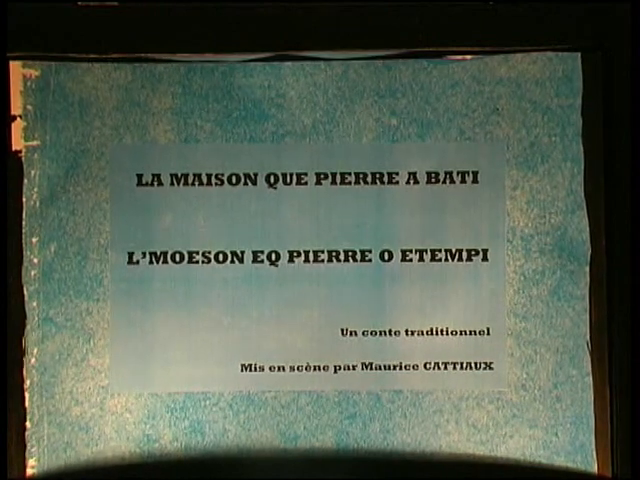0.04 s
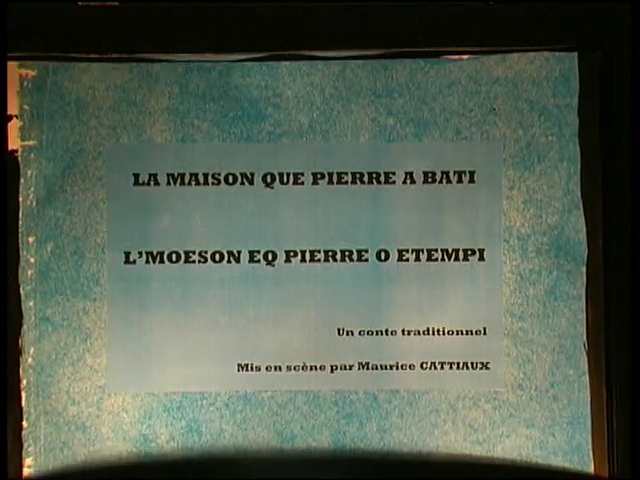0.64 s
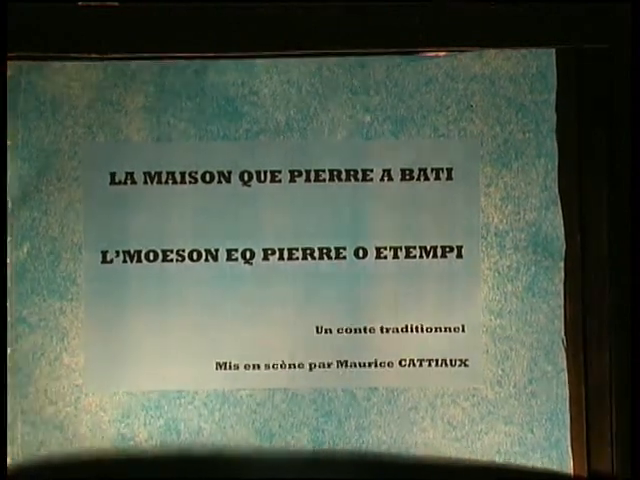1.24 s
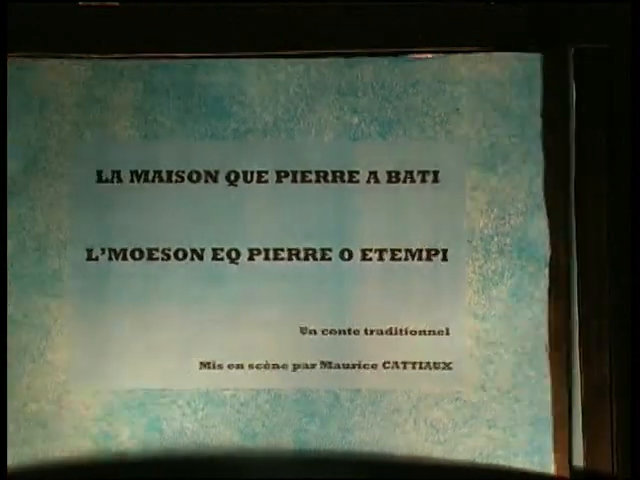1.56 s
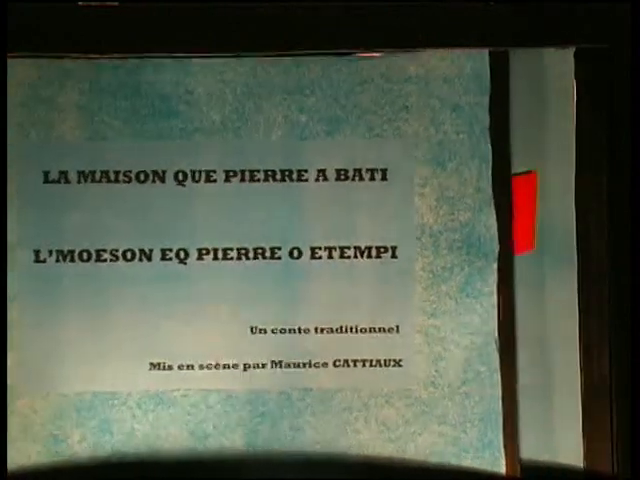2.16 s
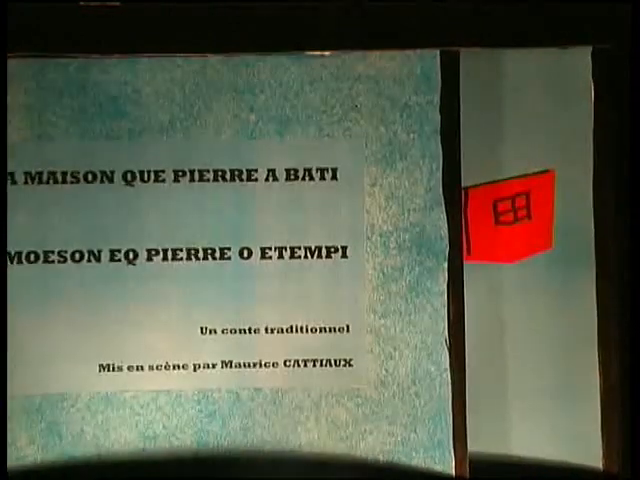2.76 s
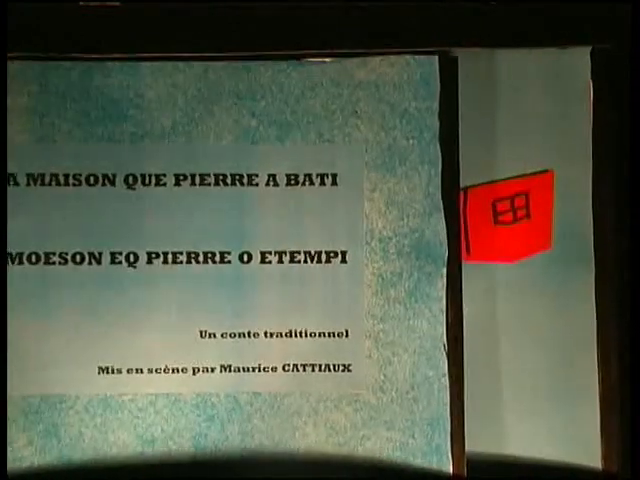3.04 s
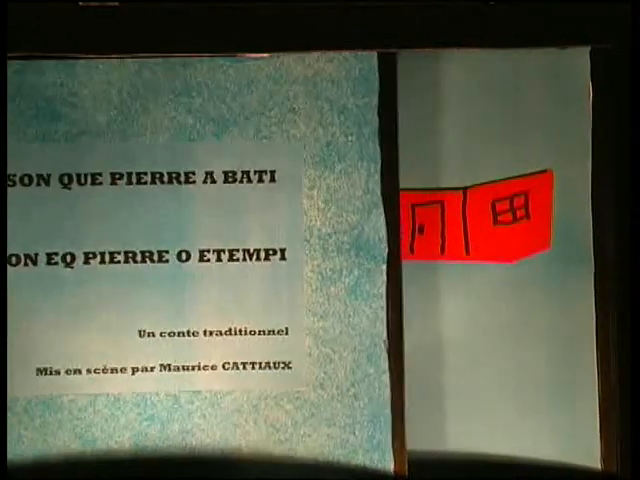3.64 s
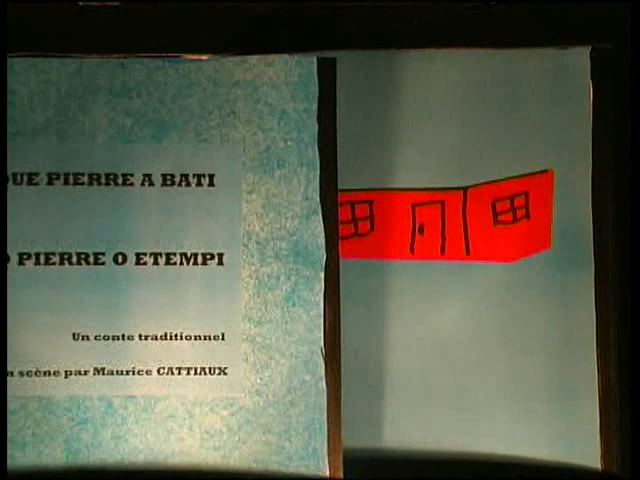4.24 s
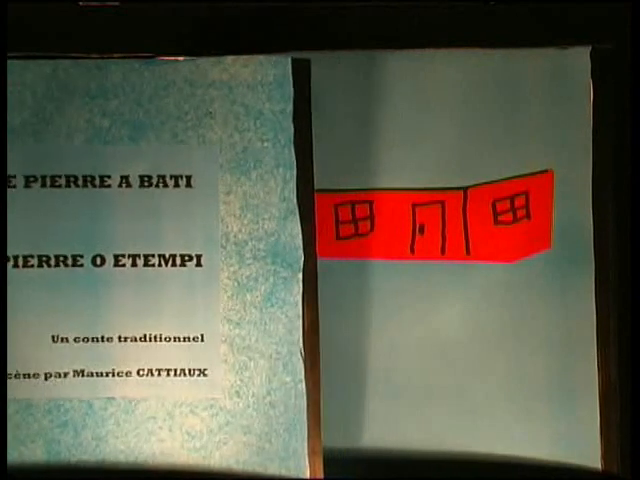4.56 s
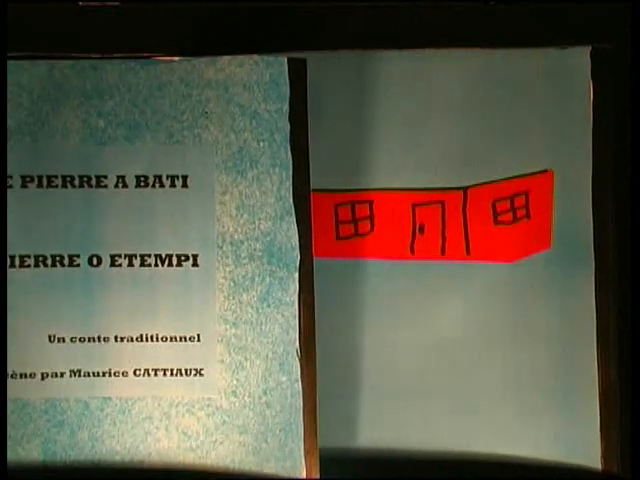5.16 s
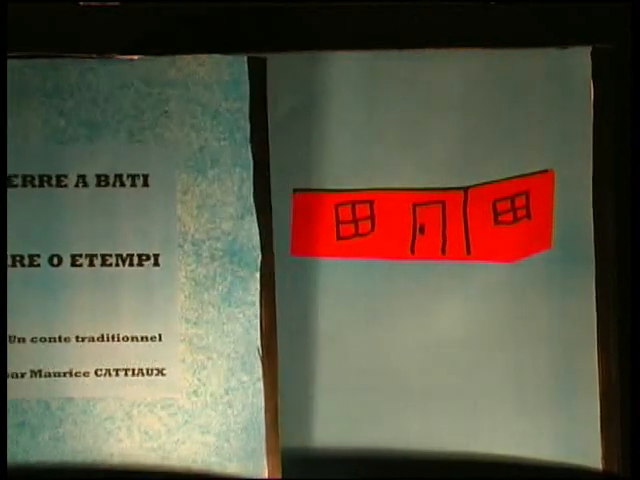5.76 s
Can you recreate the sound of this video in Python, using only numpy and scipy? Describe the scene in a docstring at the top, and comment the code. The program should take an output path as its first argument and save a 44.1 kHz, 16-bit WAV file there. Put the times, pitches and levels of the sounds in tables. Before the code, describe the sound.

A stiff card is drawn out of a wooden frame, close by in a small room. Soft hiss, a faint electrical hum and a thin high whine, leaning slightly right, run throughout. The card starts with faint rubs and small ticks, then scuffs and flexes with a slight low rumble at about 0.8 seconds. Between 1 and 1.7 seconds come short, dry slides with crisp ticks and three light bumps on the wood. Another push brings a bump at 2.2 seconds and more low flexing. At 2.5 seconds the card strikes the frame with one sharp knock, by far the loudest sound, ringing briefly in the box and room. Soft scuffs and rubs continue until about 4 seconds, with two faint taps around 3.6 and 3.8. After a pause, a last gentle slide runs from 5.3 to 6 seconds, with a small tick at 5.7.

```python
"""A small room with a tabletop theatre: a stiff picture card is drawn sideways out of its wooden frame.
The card slides on catching fibres, scuffs where it binds in the groove and flexes with a low rumble.
Its edge ticks over the grain and bumps the frame, once sharply; the box and the room ring after it.
Underneath, electrical equipment hums and whines over a soft hiss."""
import sys
import numpy as np
from scipy import signal
from scipy.fft import rfft, irfft, next_fast_len
from scipy.io import wavfile

SR = 44100
rng = np.random.default_rng(int(sys.argv[2]) if len(sys.argv) > 2 else 0)


def generate_wav(signal):
    """Clip the signal to [-1, 1] and save it as 16-bit WAV at the path in sys.argv[1]."""
    frames = np.transpose(np.atleast_2d(signal))
    scaled = np.clip(frames, -1, 1) * 32767
    pcm = np.round(scaled).astype(np.int16)
    wavfile.write(sys.argv[1], SR, pcm)


N = 265297
TIME_S = np.arange(N) / SR
FFT_SIZE = next_fast_len(N)
BINS_HZ = np.fft.rfftfreq(FFT_SIZE, 1 / SR)
IMPULSE = signal.unit_impulse(2048)


def from_db(db):
    """Decibels to gain."""
    return 10 ** (np.asarray(db) / 20)


def unit_rms(x):
    """Scale to rms 1."""
    return x / np.sqrt(np.mean(np.abs(x) ** 2) + 1e-20)


def at_peak(x, db):
    """Scale to a peak level."""
    return from_db(db) * x / np.abs(x).max()


def at_hz(table, hz, column=1):
    """Interpolate a column over log frequency."""
    table = np.array(table)
    return np.interp(np.log(np.maximum(hz, 1)), np.log(table[:, 0]), table[:, column])


def band(x, low_hz, high_hz, order=2):
    """Causal band-pass."""
    edges_hz = np.clip([low_hz, high_hz], [15, 30], [0.44 * SR, 0.45 * SR])
    return signal.sosfilt(signal.butter(order, edges_hz, "band", fs=SR, output="sos"), x)


def soften(x, top_hz, order=4):
    """Low-pass: a contact of finite length lacks treble."""
    return signal.sosfilt(signal.butter(order, top_hz, fs=SR, output="sos"), x)


def colour(x, spectrum):
    """Impose a spectrum; rms 1."""
    shaped = rfft(x, FFT_SIZE) * from_db(at_hz(spectrum, BINS_HZ))
    return unit_rms(irfft(shaped, FFT_SIZE)[..., :N])


def drift(rate_hz):
    """Smooth random motion; rms 1."""
    hop, settle = 100, 1000
    pole = np.exp(-2 * np.pi * rate_hz * hop / SR)
    white = rng.standard_normal(N // hop + settle + 2)
    slow = signal.lfilter([1], [1, -2 * pole, pole * pole], white)[settle:]
    return np.interp(np.arange(N) / hop, np.arange(len(slow)), unit_rms(slow))


def stereo(mid, side, correlation):
    """Two independent signals to a correlated left and right."""
    left_right = np.sqrt(1 + correlation) * mid + np.sqrt(1 - correlation) * side * [[1], [-1]]
    return left_right / np.sqrt(2)


def pan(x, db):
    """Lean left (positive) or right (negative)."""
    return x * from_db([[db / 2], [-db / 2]])


def delay(x, delay_s):
    """Fractional delay, same length."""
    samples = np.arange(len(x))
    return np.interp(samples - delay_s * SR, samples, x, left=0)


def add(track, start_s, sound):
    """Mix a short sound into a track."""
    start = round(start_s * SR)
    track[..., start:start + sound.shape[-1]] += sound[..., :N - start]


def swells(rows):
    """Envelope of Gaussian swells."""
    return sum(from_db(db) * np.exp(-0.5 * ((TIME_S - centre_s) / sigma_s) ** 2)
               for centre_s, db, sigma_s in rows)


# Hiss spectrum: freq_hz, density_db
HISS_SPECTRUM = [(20, -6.5), (45, -5), (100, -4), (200, -5), (330, -10), (600, -13), (1200, -14),
                 (2500, -15), (3900, -14.5), (5000, -19), (8000, -22.5), (11000, -26.5), (13000, -33),
                 (14500, -39)]
# Left-right likeness: freq_hz, correlation
HISS_CORRELATION = [(40, 0.45), (100, 0.97), (300, 0.3), (700, 0.06), (2000, 0.12), (5000, 0.045),
                    (12000, 0.023)]

def hiss(level_db=-56):
    """Room air: alike at both ears in the bass, wide in the treble."""
    mid, side = rfft(rng.standard_normal((2, FFT_SIZE)))
    air = irfft(stereo(mid, side, at_hz(HISS_CORRELATION, BINS_HZ)), FFT_SIZE)
    return from_db(level_db) * colour(air, HISS_SPECTRUM)


# Harmonics of 50 Hz mains: pitch_hz, left_db, right_db, left_lead_rad
MAINS_HARMONICS = [(150, -76, -50.5, 2.3), (1500, -68, -66, 0.69), (1800, -74.5, -76, 0.5)]

def hum(waver_db=0.4):
    """Nearly steady mains harmonics, unequal at the two ears."""
    out = np.zeros((2, N))
    for hz, left_db, right_db, lead_rad in MAINS_HARMONICS:
        tone = np.sqrt(2) * np.sin(2 * np.pi * hz * TIME_S + [[lead_rad], [0]])
        out += tone * from_db([[left_db], [right_db]]) * from_db(waver_db * drift(3))
    return out


# Leading whine tones: pitch_hz
WHINE_LEAD_HZ = (3540, 4046)
# Their slow swells: mean_db, swing_db, period_s, crest_s
WHINE_SWELLS = [(-66, 3, 1.58, 4.64), (-66, 2.5, 1.216, 3.24)]
# Faint whine tones: pitch_hz
WHINE_FAINT_HZ = (3300, 3446, 3600, 3635, 3746, 3899, 3951, 4199, 4251, 5055, 5469, 5563, 6988, 7180, 11100,
                  11396, 11698)
# Their strengths: level_db
WHINE_FAINT_DB = (-81, -80, -75.5, -74, -76, -72.5, -79, -76, -77.5, -95, -85.5, -80, -84.5, -77, -89, -89,
                  -89)

def whine(waver_db=3.8, wander_hz=0.74, left_db=-4, right_lag_s=16e-6):
    """High electrical tones, right of centre, swelling singly and wandering in pitch together."""
    lead = [(hz, db + swing_db * np.cos(2 * np.pi * (TIME_S - crest_s) / period_s))
            for hz, (db, swing_db, period_s, crest_s) in zip(WHINE_LEAD_HZ, WHINE_SWELLS)]
    faint = [(hz, db + waver_db * drift(1)) for hz, db in zip(WHINE_FAINT_HZ, WHINE_FAINT_DB)]
    wander_cycles = np.cumsum(wander_hz * drift(1.9)) / SR
    tones = np.zeros(N)
    for hz, db in lead + faint:
        phase = 2 * np.pi * (hz * TIME_S + wander_cycles + rng.random())
        tones += np.sqrt(2) * from_db(db) * np.sin(phase)
    return np.array([tones * from_db(left_db), delay(tones, right_lag_s)])


# Reverberation: freq_hz, gain_db, t60_s
ROOM_DECAY = [(140, 4, 0.29), (240, 11.5, 0.27), (382, 4.5, 0.42), (590, 9, 0.53), (850, 9.5, 0.4),
              (1060, 2.5, 0.42), (1280, -5.5, 0.41), (1810, 2, 0.5), (2640, -5.5, 0.53), (4560, 1, 0.32),
              (6760, -2, 0.46), (12000, 0.5, .28)]

def room(x, predelay_s=0.0012, build_s=0.00029, correlation=0.16):
    """Diffuse tail, decaying in third-octave bands."""
    t = np.maximum(TIME_S[:SR] - predelay_s, 0)
    onset = 1 - np.exp(-t / build_s)
    white = rng.standard_normal((2, 2, SR))
    edges_hz = 100 * 2 ** (np.arange(23) / 3)
    response = np.zeros((2, SR))
    for k, (low, high) in enumerate(zip(edges_hz, edges_hz[1:])):
        hz = np.sqrt(low * high)
        noise = band(stereo(*white[k % 2], correlation), low, high)
        decay = from_db(-60 * t / at_hz(ROOM_DECAY, hz, column=2))
        gain = from_db(at_hz(ROOM_DECAY, hz)) * np.sqrt(2 * (high - low)) / SR
        response += gain * unit_rms(noise * decay * onset)
    return signal.fftconvolve(x[None], response, axes=1)[:, :N]


def table_echo(x, delay_s=0.0068, echo_db=-12):
    """Direct sound plus one reflection off the table top."""
    return x + from_db(echo_db) * delay(x, delay_s)


# Card flexes: centre_s, level_db, sigma_s
FLEX_SWELLS = [(.82, -57, 0.056), (.94, -59, 0.022), (2.26, -53.5, 0.051), (2.37, -52, 0.05)]
# Rumble spectrum: freq_hz, density_db
FLEX_SPECTRUM = [(20, -2), (40, -2.5), (100, -3.5), (200, -15.5), (400, -17.5), (1000, -50)]

def flexes():
    """The card flexes and the table rumbles."""
    return swells(FLEX_SWELLS) * colour(rng.standard_normal(N), FLEX_SPECTRUM)


def fibres(catches_per_s=6000):
    """Friction: fibres catch and let go at random, in uneven bunches."""
    sizes = from_db(2.5 * np.minimum(rng.exponential(1, N), 4)) * rng.standard_normal(N)
    catches = rng.random(N) < catches_per_s / SR
    bunching = from_db(4.5 * np.clip(drift(60), -2, 1.6))
    return sizes * catches * bunching


# Card binds: centre_s, level_db, sigma_s
SCUFF_SWELLS = [(.186, -56.5, 0.0075), (.25, -51, 0.0053), (.69, -60.5, 0.02), (.81, -42, 0.0072),
                (1.46, -49, 0.0081), (2.92, -56, 0.019), (3.118, -50, 0.016), (3.252, -52, 0.0094),
                (3.345, -55.5, 0.015), (3.72, -57, .016), (5.435, -57, 0.0069)]
# Scuff spectrum: freq_hz, density_db
SCUFF_SPECTRUM = [(300, -3), (1500, -36), (2100, -17), (2550, 6), (2950, 1.5), (3400, -7), (6000, -11),
                  (12000, -30.5)]

def scuffs():
    """Short bursts of friction where the card binds."""
    return swells(SCUFF_SWELLS) * colour(fibres(), SCUFF_SPECTRUM)


# Hand pushes: start_s, length_s, level_db
HAND_PUSHES = [(.03, 0.3, -66.5), (0.37, 0.028, -57.5), (0.791, .05, -52.5), (1.068, 0.16, -53),
               (1.4, 0.043, -54), (1.55, .11, -51.5), (1.965, 0.28, -57), (2.277, 0.3, -52),
               (3.098, 0.031, -54), (3.235, .025, -59), (3.53, 0.14, -59.5), (3.692, 0.044, -59),
               (3.893, 0.14, -58), (5.32, 0.14, -65.5), (5.529, .13, -56.5), (5.748, .16, -63.5)]
# Sliding friction spectrum: freq_hz, density_db
SLIDE_SPECTRUM = [(200, 0), (600, -9), (1400, 3), (2700, 8), (4500, 2), (7500, -1.5), (10000, -8.5),
                  (14000, -30.5)]

def slide(rise_share=0.11, coast_s=0.038):
    """Dry friction hiss: each push speeds the card up, holds, then lets it coast to rest."""
    envelope = np.zeros(N)
    for start_s, length_s, db in HAND_PUSHES:
        t = np.maximum(TIME_S - start_s, 0)
        rise = 1 - np.exp(-t / (rise_share * length_s))
        coast = np.exp(-np.maximum(t - length_s, 0) / coast_s)
        envelope += from_db(db) * rise * coast
    return envelope * colour(fibres(), SLIDE_SPECTRUM)


# Edge snaps: start_s, level_db, pitch_hz, send_db
EDGE_TICKS = [(.0564, -39.5, 6300, 6), (0.3415, -28.5, 7900, 2), (0.802, -31.5, 7600, -4),
              (1.0891, -24, 6640, 0.5), (1.1511, -21, 6860, -6), (1.516, -34, 6450, -1),
              (1.641, -32.5, 5400, -12), (2.3537, -27, 6000, -5), (5.692, -37, 4800, -2)]

def ticks(slip_s=0.0017, slip_db=-14, body_db=-7.5):
    """The edge snaps over the grain and trails off in a tiny rough slip, the card's body under it."""
    direct, send = np.zeros((2, N))
    slip_envelope = from_db(slip_db) * np.exp(-TIME_S[:len(IMPULSE)] / slip_s)
    for start_s, db, hz, send_db in EDGE_TICKS:
        force = IMPULSE + slip_envelope * rng.standard_normal(len(IMPULSE))
        edge = band(force, 0.85 * hz, 1.1 * hz, order=1)
        body = from_db(body_db) * band(force, 2070, 8400)
        snap = at_peak(soften(edge + body, 0.91 * hz, order=2), db)
        add(direct, start_s, snap)
        add(send, start_s, snap * from_db(send_db))
    return direct, send


# Standing waves in the wooden box: pitch_hz, gain_db, t60_s
BOX_MODES = [(188, 2, 0.54), (276.5, 16, 0.23), (324, 14, 0.24), (429, 23, 0.36), (482, 26.5, 0.31),
             (645, 4, 0.94), (738, 16.5, 0.21), (837, 14.5, 0.2), (1190, -31, 1), (1290, -9, 0.59),
             (1410, 8, 0.28), (1445, 16, 0.15), (1735, 14, 0.57)]

def box_ring(blow, position, spacing_hz=215, ear_spread_rad=0.63, build_s=0.0042):
    """A blow feeds each standing wave by how far it lands from that wave's nodes."""
    t = TIME_S[:SR]
    response = np.zeros((2, SR))
    for hz, db, t60_s in BOX_MODES:
        coupling = np.cos(np.pi * position * hz / spacing_hz)
        ear_phase = ear_spread_rad * rng.standard_normal((2, 1))
        unity_gain = 2 * np.log(1000) / (t60_s * SR)  # at resonance
        envelope = unity_gain * from_db(db - 60 * t / t60_s)
        response += coupling * envelope * np.sin(2 * np.pi * hz * t + ear_phase)
    response *= 1 - np.exp(-t / build_s)
    return signal.fftconvolve(blow[None], response, axes=1)


# Damped resonances of card and frame: pitch_hz, width_hz, gain_db
FRAME_MODES = [(315, 417, -19.5), (712, 235, -13.5), (1352, 437, 2), (1980, 183, -7.5), (2560, 536, -13.5),
               (4440, 480, -24.5), (7370, 960, -36), (9900, 6300, -62)]
# Bumps on the frame: start_s, level_db, thud_db, clack_db, top_hz, send_db, position_frac, rebound_db
FRAME_KNOCKS = [(0.8049, -40, 18, 15, 6000, -4.5, 0.26, -14),
                (1.0776, -27.5, 13.5, 21, 3600, 4, .23, -18.5),
                (1.418, -33, 22, 17.5, 3200, -1.5, 0.66, -7.5), (1.6195, -24, 11, -5, 6000, 2.5, 0.2, -15),
                (2.2387, -21.5, 11, 19, 3400, 1, 0.65, -10.5),
                (2.4927, -3, 1.5, 2, 14000, -0.76, 0.08, -41), (3.562, -39.5, 19, 12, 4500, 3, 0.22, -16),
                (3.762, -41, 14.5, 21, 2000, 0.5, 0.47, -16)]

def knocks(rebound_s=0.005774, rebound_top_hz=1780):
    """The card bumps the frame, lands again more softly and sets the box ringing."""
    direct, send = np.zeros((2, N))
    box = np.zeros((2, N))
    modes = [(hz, band(IMPULSE, hz - width_hz / 2, hz + width_hz / 2) * from_db(db))
             for hz, width_hz, db in FRAME_MODES]
    for start_s, db, thud_db, clack_db, top_hz, send_db, position, rebound_db in FRAME_KNOCKS:
        tilt = [(600, thud_db), (1350, 0), (2800, clack_db)]  # set by how the card lands
        blow = sum(ring * from_db(at_hz(tilt, hz)) for hz, ring in modes)
        blow = at_peak(soften(blow, top_hz, order=6), db)
        rebound = at_peak(soften(blow, rebound_top_hz), db + rebound_db)
        knock = blow + delay(rebound, rebound_s)
        sent = knock * from_db(send_db)
        add(direct, start_s, knock)
        add(send, start_s, sent)
        add(box, start_s, box_ring(sent, position))
    return direct, send, box


def scene(rub_direct_db=-3, rub_send_db=-1):
    """The card close by, box and room leaning right, over the steady background."""
    knock_direct, knock_send, box = knocks()
    tick_direct, tick_send = ticks()
    rub = slide() + scuffs() + flexes()
    near = table_echo(knock_direct + tick_direct + from_db(rub_direct_db) * rub)
    reverb = room(knock_send + tick_send + from_db(rub_send_db) * rub)
    card = pan(near, db=0.5) + pan(reverb, db=-1.5) + pan(box, db=-4)
    return card + hum() + whine() + hiss()


def record(dry, cutoff_hz=14200):
    """Steep elliptic low-pass."""
    return signal.sosfilt(signal.ellip(10, 0.2, 70, cutoff_hz, fs=SR, output="sos"), dry)


dry = scene()
out = record(dry)
generate_wav(out)
```